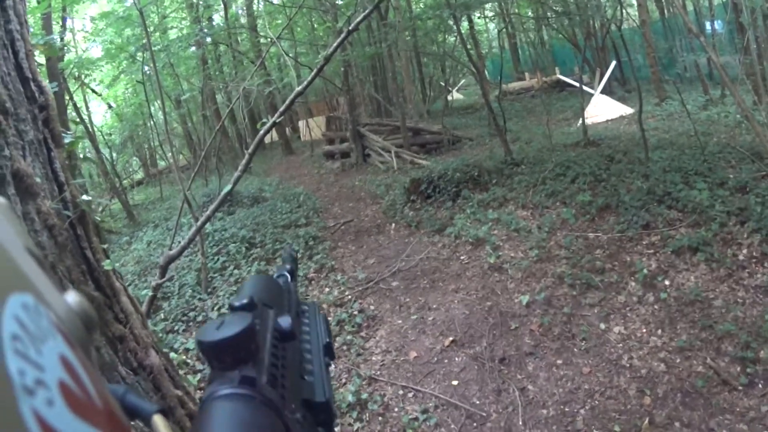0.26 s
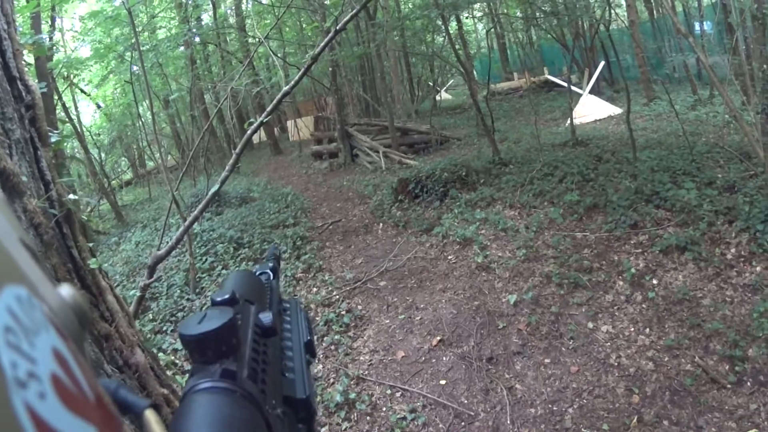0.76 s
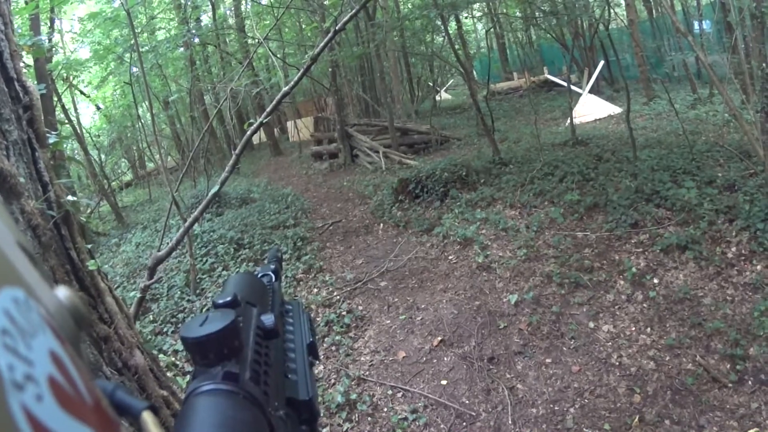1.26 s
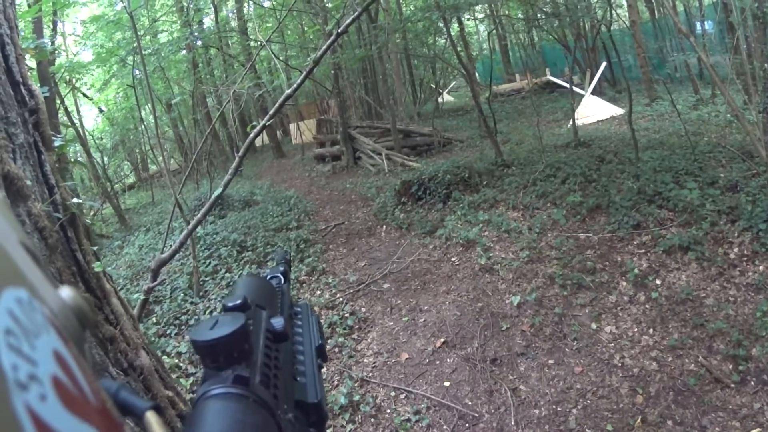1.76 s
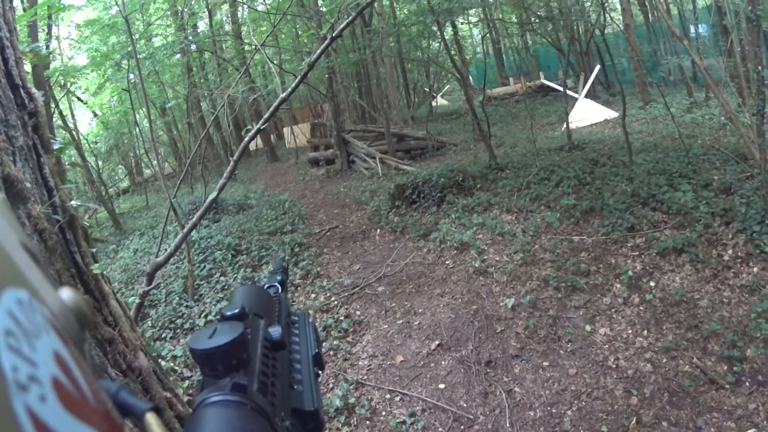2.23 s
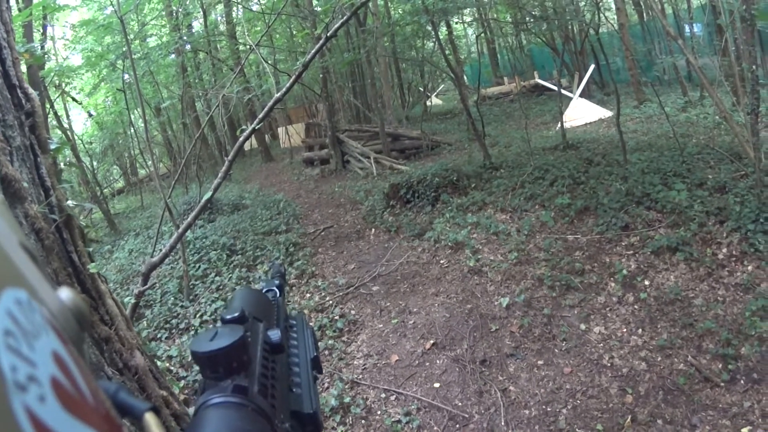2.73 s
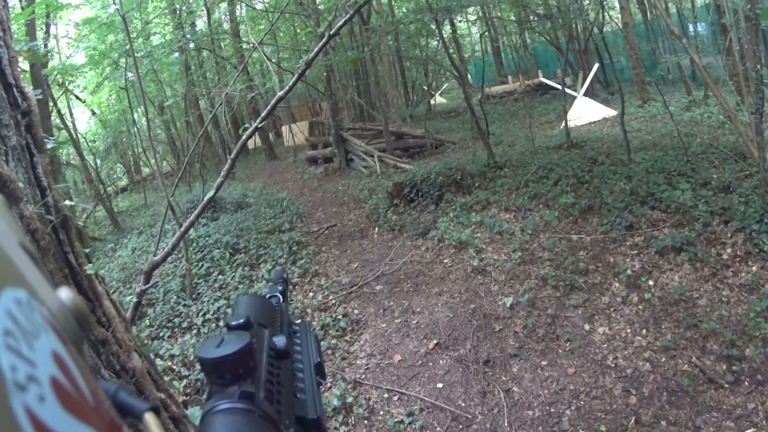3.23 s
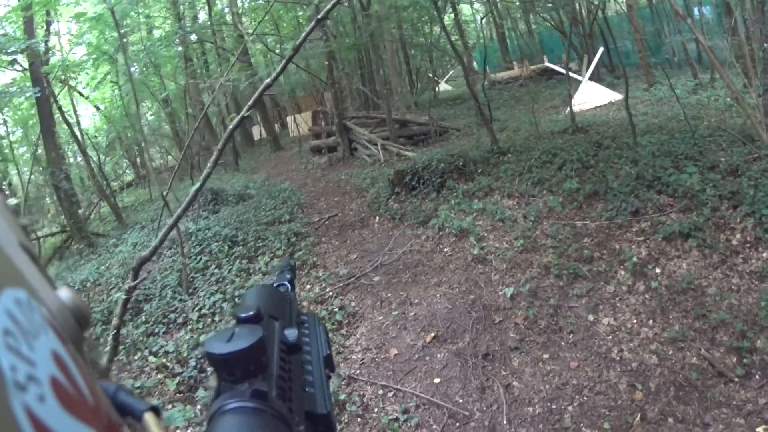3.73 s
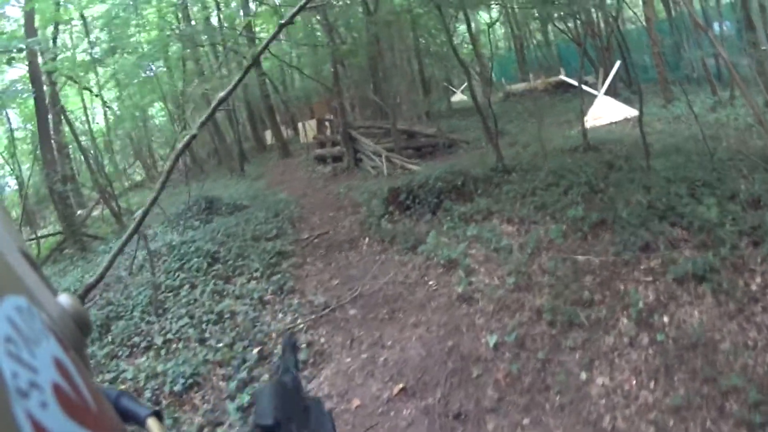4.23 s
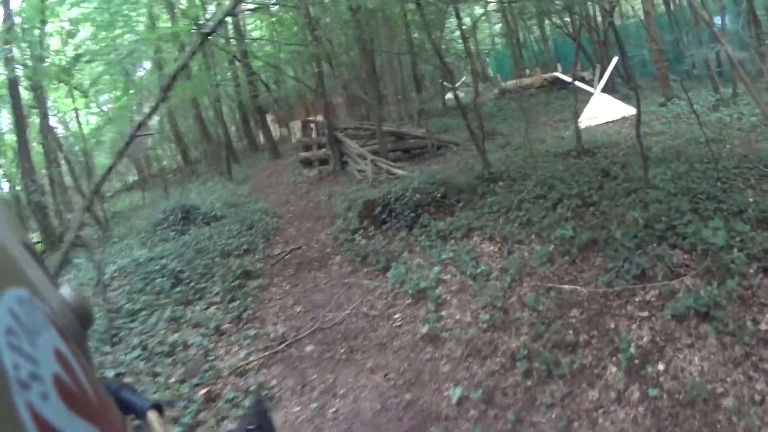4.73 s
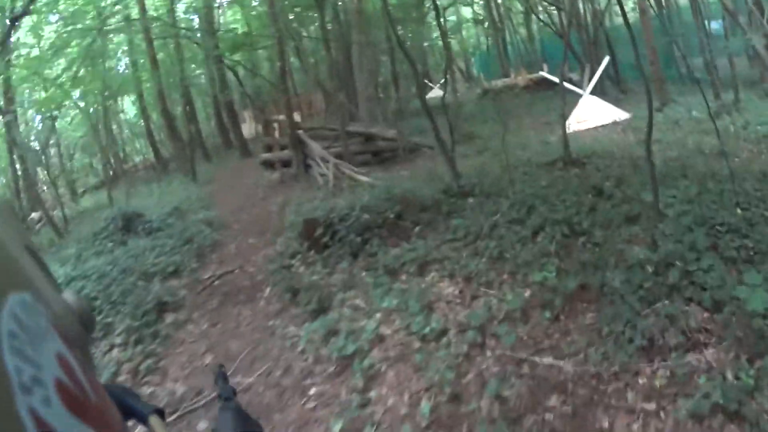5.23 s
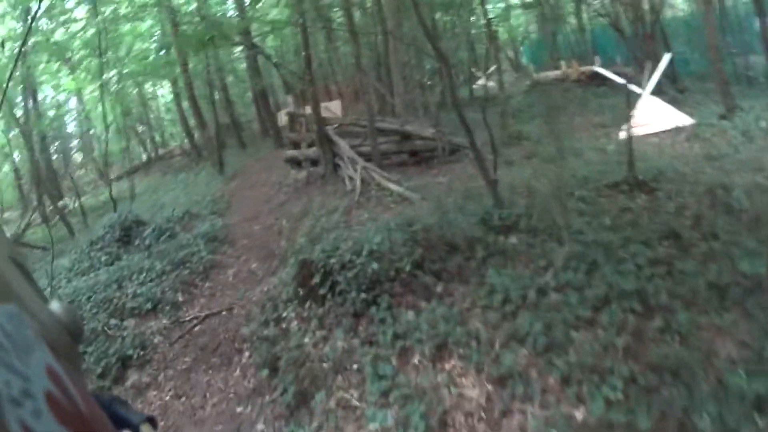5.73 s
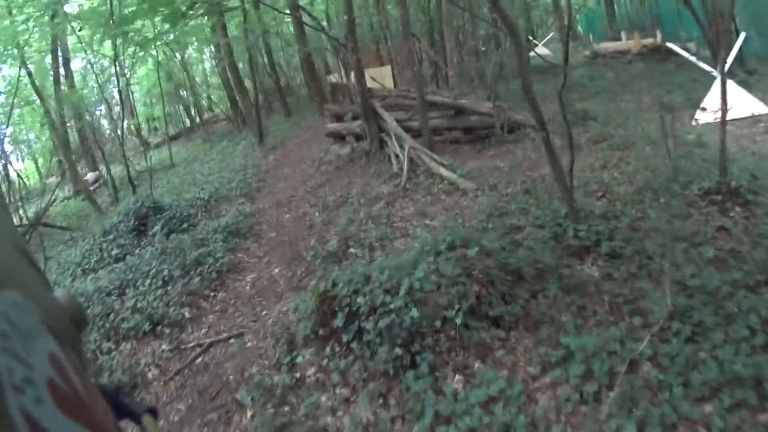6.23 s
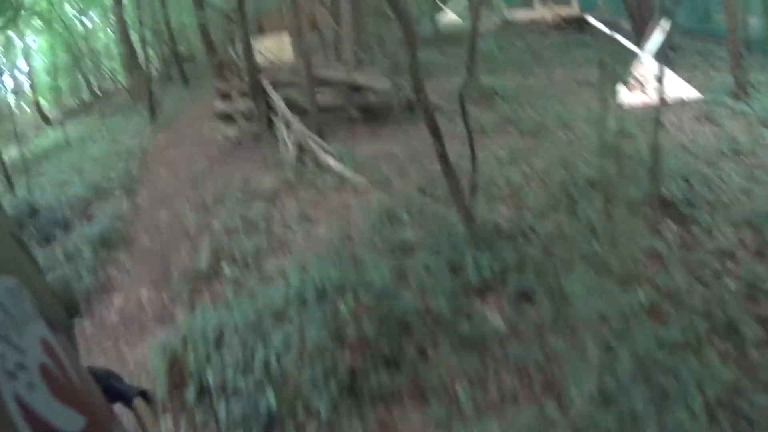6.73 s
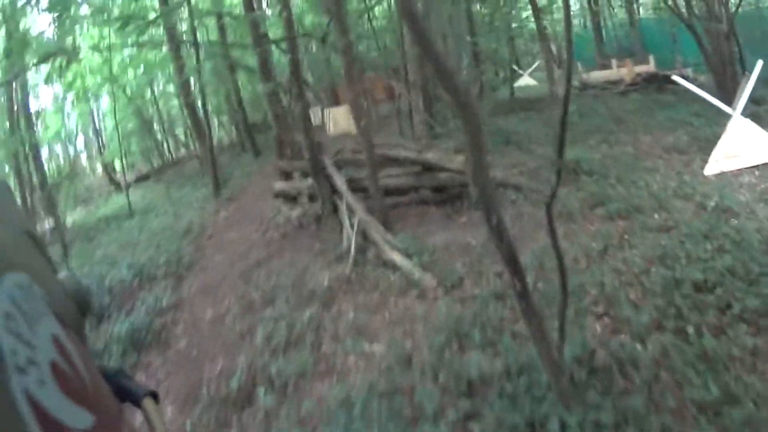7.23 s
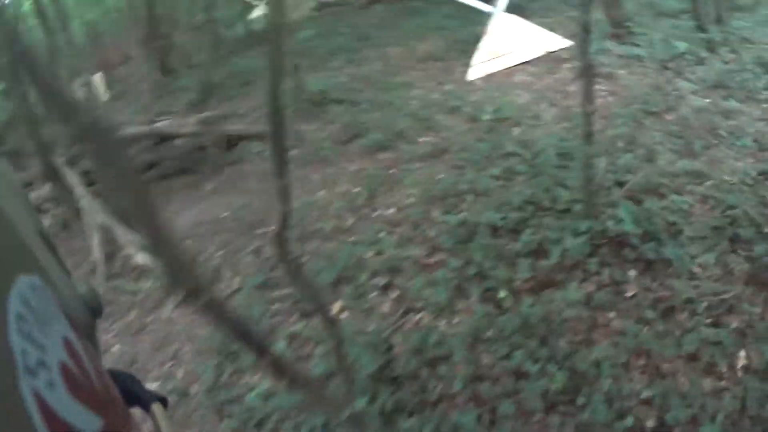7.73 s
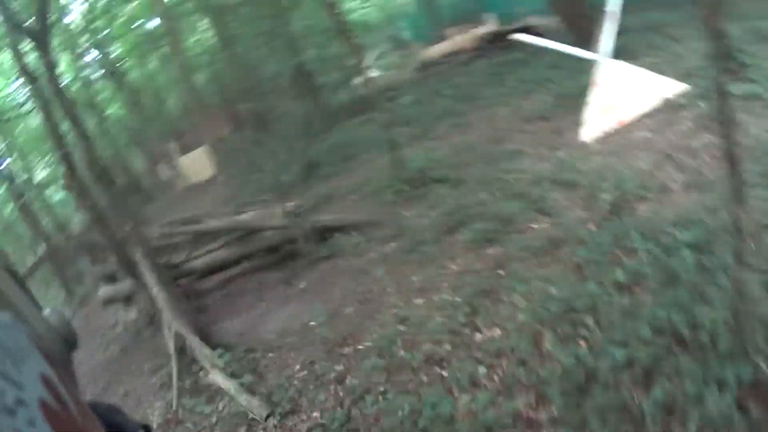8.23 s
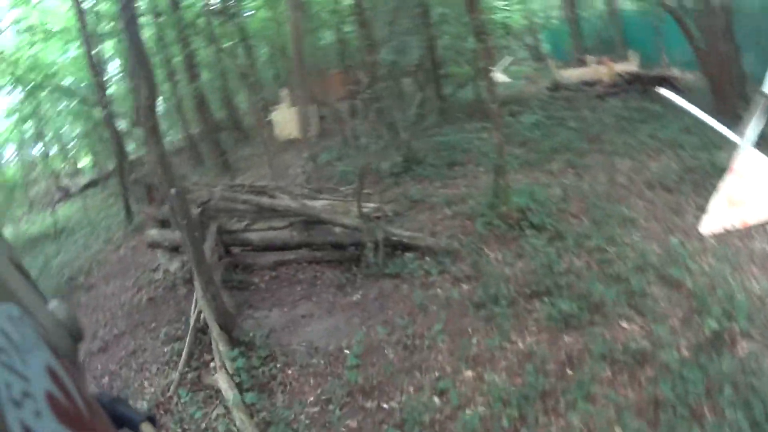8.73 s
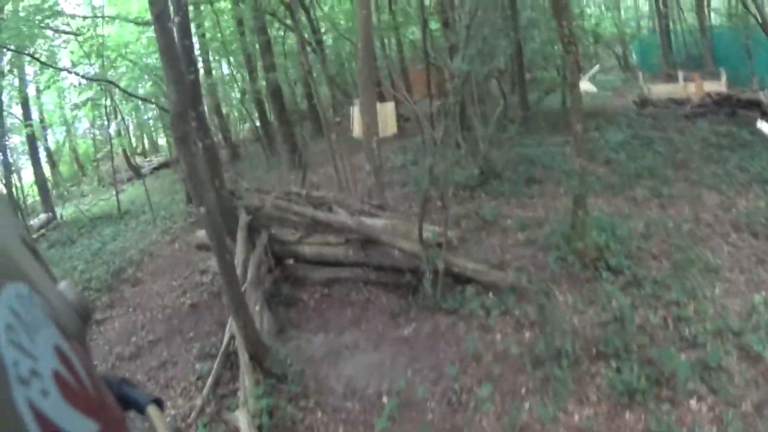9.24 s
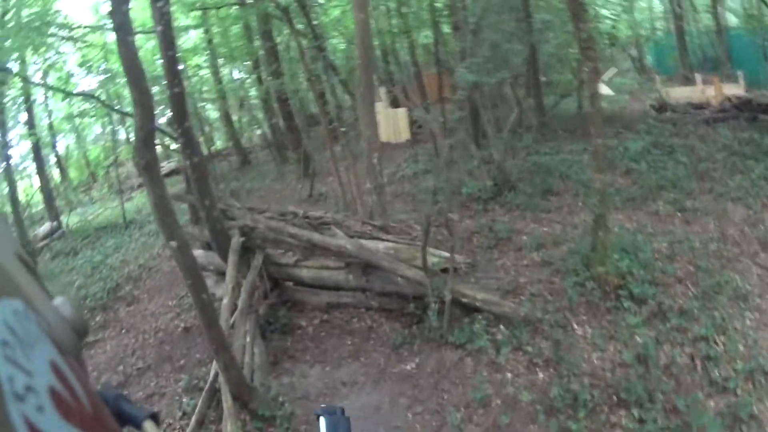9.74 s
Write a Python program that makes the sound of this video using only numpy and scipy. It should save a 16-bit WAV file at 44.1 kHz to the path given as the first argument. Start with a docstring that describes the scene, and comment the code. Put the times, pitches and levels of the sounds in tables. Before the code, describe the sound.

Distant and close bursts of electric toy gunfire in woodland, a quiet pause with faint birds, then rustling leaf footsteps and rattling gear.

```python
"""Another rifle's volley cracks among trees over faint leaf hiss; then the wearer's airsoft rifle fires two bursts.
Later the wearer walks over leaf litter, gear knocks on a camera's plastic case, and small birds call far off.
Impacts are short noise bursts, mostly with a click, driving resonances or filters; leaves, cloth and gears are
shaped noise, birds are gliding sines, and trees return a decaying noise wash."""
import sys
import numpy as np
from scipy import signal
from scipy.fft import rfft, irfft
from scipy.io import wavfile
from scipy.ndimage import uniform_filter1d

SR = 44100
rng = np.random.default_rng(int(sys.argv[2]) if len(sys.argv) > 2 else 0)


def transcribe(signal):
    """Save signal, clipped to [-1, 1], as a 16-bit WAV file at the path in sys.argv[1]."""
    frames = np.atleast_2d(signal).T
    limited = np.clip(frames, -1, 1)
    pcm = np.round(limited * 32767).astype(np.int16)
    wavfile.write(sys.argv[1], SR, pcm)


N = 439677
TIME = np.arange(N) / SR  # s
HIT_TIME = np.arange(SR // 6) / SR  # s, the span of one impact

# Levels in the tables are relative: each source may apply further gains.

# Woodland air: leaf hiss spectrum. Each row: frequency in Hz, response in dB.
WOOD_SPECTRUM = [(15, -39), (25, -6), (86, -4.5), (178, -15), (225, -12), (358, -10), (954, -17),
                 (1030, -15.5), (1600, -14), (1770, -4), (2300, -13), (3050, -6), (4500, -16.5),
                 (10500, -31), (12000, -38), (15600, -93), (22000, -120)]
WOOD_DB = -53.5
# Scattering by the trunks. Each row: frequency in Hz, response in dB.
TREE_SPECTRUM = [(240, -32), (400, -17), (613, -38), (980, -36), (1480, -20.5), (1730, -4.5), (2210, -12.5),
                 (3380, 0.5), (4370, -4), (5260, -2), (5810, -5), (10600, -15.5), (11300, -25),
                 (12000, -60), (15600, -112), (22000, -120)]
# Drawn-out bird whistles. Each row: start in seconds, length in seconds, starting pitch in Hz, level in dB.
WHISTLES = [(3.08, 0.106, 4250, -66), (3.26, 0.156, 6880, -65.5), (3.535, 0.073, 5194, -56.5),
            (4.16, .1, 6180, -60), (4.294, 0.116, 7960, -68), (4.48, 0.152, 7900, -67),
            (4.66, .14, 7900, -67)]
WHISTLE_SAG_HZ_PER_S = 2000
# A trill of short falling notes
TRILL_S, TRILL_GAP_S, TRILL_NOTES = 3.642, .0875, 6
TRILL_NOTE_S, TRILL_FROM_HZ, TRILL_TO_HZ, TRILL_DB = 0.0246, 4970, 4425, -55

# How much the wearer moves. Each row: time in seconds, cloth level in dB, straps rubbing on the case in dB.
MOTION = [(2.3, -76.5, -73), (3.05, -67.5, -66), (4.16, -59, -53.5), (4.5, -63.5, -52), (4.75, -68, -56),
          (4.99, -54, -59), (5.14, -59, -50.5), (5.8, -58.5, -50.5), (6.21, -57.5, -45.5), (7.08, -52, -49),
          (7.51, -52.5, -48.5), (7.68, -60.5, -54), (8.11, -52, -48.5), (8.26, -63, -53.5),
          (9.09, -57.5, -54), (9.24, -50.5, -52), (9.54, -54.5, -49), (9.97, -53, -62)]
STILL_DB = -63  # rubbing level at which the soft gate on motion noise is half open
# Coarse leaf crackle. Each row: frequency in Hz, response in dB.
LEAF_SPECTRUM = [(900, -10.5), (1300, -2.5), (2200, -10.5), (3000, 3.5), (4200, -1), (5600, -9.5),
                 (7500, -29), (11000, -42.5)]
# Crisp leaf crackle. Each row: frequency in Hz, response in dB.
CRISP_SPECTRUM = [(3000, -20.5), (5500, 6), (7000, 0), (9000, 0), (11000, -11.5)]
# Shifting cloth. Each row: frequency in Hz, response in dB.
CLOTH_SPECTRUM = [(25, -1.5), (50, -7.5), (90, 3.5), (200, -8), (300, -5.5), (420, 2), (600, -15.5),
                  (900, -24.5), (1500, -28.5)]
FOLDS_PER_S, FOLD_DB = 22, 2.5  # cloth shifts in fits as its folds give way
# Boots sweeping through leaves. Each row: start in seconds, length in seconds, level in dB.
SWEEPS = [(4.905, 0.301, -48.5), (5.402, 0.18, -46), (5.654, 0.33, -42), (5.98, 0.68, -42),
          (6.583, 0.35, -42.5), (7.102, 0.23, -40), (7.313, 0.1124, -42), (7.76, 0.25, -46),
          (7.943, 0.2833, -41.5), (8.411, 0.55, -44), (9.192, 0.34, -48.5), (9.64, 0.44, -51)]
# Fine crackle of a sweep. Each row: frequency in Hz, response in dB.
SWEEP_SPECTRUM = [(1200, -23), (2000, 5.5), (3200, 6), (4400, -0.5), (5500, 1.5), (7000, -10), (11000, -11)]
# Footfalls and jolts through the body. Each row: start in seconds, level in dB, pack bump in dB relative to it.
STEPS = [(1.2, -60, 7), (3.888, -43, -15), (4.044, -37.5, 2.5), (4.221, -44, -18.5), (4.997, -31.5, -5.5),
         (5.523, -33, -5), (6.119, -45, 2), (6.41, -35, -3.5), (6.793, -33.5, 0.5), (7.341, -34.5, -18),
         (7.589, -39, -4), (8.19, -43, -7.5), (8.788, -38, -1), (9.469, -44, -13)]
TOE_S, TOE_DB = 0.088, -12  # the sole rolls down after the heel
SWAY_HZ, SWAY_DB = 29, -6.5  # each step also shakes the camera slowly

# Gear knocking on the case; the rows at 6.634 and 6.7495 s are the sharp smack of the other rifle's two shots.
# # Each row: start in seconds, level in dB, ring of the loose part in Hz, hardness in dB, weight in dB.
KNOCKS = [(0.08, -33, 3500, -6, -5.5), (0.1816, -30, 3100, -10, -8.5), (0.3142, -28, 4050, 2.5, -2.5),
          (0.3486, -26.5, 2520, 0, -9.5), (3.38, -44, 2600, -12, -16), (4.0524, -23.5, 2560, -5.5, -15),
          (5.001, -24, 2450, -14, -13), (5.243, -23.5, 2400, -32.5, -26), (5.3048, -32.5, 2850, -5.5, -42),
          (5.4782, -35, 2740, -7, -8.5), (5.5224, -19.5, 2450, -1, -12), (5.5705, -32, 2610, -20, -37),
          (6.4123, -30.5, 3120, 3, -9.5), (6.634, -20.5, 2960, -2.5, -44), (6.7495, -22, 3206, 1, -45.5),
          (7.3901, -16.5, 2680, -2.5, -24.5), (7.5793, -23, 2560, -3, -11.5), (7.633, -33, 3540, -32, -8),
          (7.9108, -14, 2300, -29.5, -31), (8.2208, -18.5, 2350, 3, -26), (8.2371, -22, 2820, 3.5, -32),
          (8.759, -28.5, 2550, -10, -13), (9.6353, -38, 3450, -12.5, -12), (9.7126, -26, 3340, 5, -23),
          (9.7275, -25.5, 2540, 1, -6.5)]
KNOCK_T60_S = 0.031
# Upper resonances of the case. Each row: frequency in Hz, width in Hz, gain in dB.
CASE_MODES = [(1650, 41, -52), (1781, 108, 17), (1940, 77, -8), (2590, 68, -6)]
# Lower resonances of the case. Each row: frequency in Hz, width in Hz, gain in dB.
LOW_CASE_MODES = [(512, 24, -1), (777, 26, -5.5), (1197, 77, 7)]
LOW_RING_DB, LOW_RING_PER_WEIGHT = -4.5, 0.29  # dB, dB per dB: heavier knocks reach the lower modes
# Bright tick of a hard contact. Each row: frequency in Hz, response in dB.
TICK_SPECTRUM = [(1500, -22), (3000, 4.5), (4200, -4), (4800, -14), (5400, 1), (6400, -13), (7300, -3),
                 (8800, -17), (11000, -14.5)]
TICK_DB, TICK_PER_HARDNESS = -7.5, 2.75  # dB, dB per dB: harder knocks tick more
# Dull thud of a heavy contact. Each row: frequency in Hz, response in dB.
THUD_SPECTRUM = [(25, -37), (70, 10), (150, -6), (260, -8), (400, 0.5), (560, -8), (750, -5.5),
                 (1200, -36.5)]
# A loose part chattering on the case. Each row: start in seconds, length in seconds, time between bounces
# in seconds, level of each bounce in dB, hardness in dB.
CHATTERS = [(5.011, .015, .005, -9.5, -18.5), (5.033, .009, 0.0054, -10, -21),
            (5.0938, .02, .0075, -8, -14)]
BOUNCE_SCATTER_DB, CHATTER_HZ, CHATTER_WEIGHT_DB = 1.5, 2470, -33.5
# Twigs snapping and buckles clicking. Each row: start in seconds, level in dB.
SNAPS = [(0.437, -36), (2.015, -36.5), (4.6746, -33), (5.1227, -27), (5.159, -25), (5.7828, -32),
         (5.8493, -31), (6.114, -25.5), (6.3262, -32), (7.8324, -33.5), (7.8802, -32.5), (8.278, -28),
         (9.188, -36.5), (9.5773, -24.5), (9.7556, -29)]
SNAP_HZ, SNAP_SCATTER = 2760, 0.18  # centre pitch, its spread in natural-log units
JOSTLES_PER_S, JOSTLE_FROM_DB = 5, -54  # gear jostles once the straps rub this loudly
JOSTLE_DB, JOSTLE_SCATTER_DB = 7.5, 4  # click level relative to the rubbing straps, and its spread

# Trigger pulls of the other rifle. Each row: start in seconds, number of shots, crack in dB, tree echo in dB.
VOLLEYS = [(-.0301, 4, -14, -31), (0.4294, 1, -24, -35.5), (1.952, 1, -27.5, -35), (5.911, 5, -17.5, -29),
           (6.631, 2, -52.5, -35), (9.4532, 1, -22.5, -42.5), (9.5777, 1, -31.5, -55)]
# Crack of a shot. Each row: frequency in Hz, response in dB.
CRACK_SPECTRUM = [(290, -46), (500, -25), (1170, -28), (3010, 7.5), (3820, 10.5), (4610, 2), (5260, 4.5),
                  (9200, 1.5), (10900, -10), (12000, -60), (15600, -108), (22000, -120)]
CYCLE_S, SPIN_UP_S = .1146, .0055  # time between shots; the first cycle is slower by the second value

# Gearbox cycles of the own rifle. Each row: gears take up the spring in seconds, piston is let go in seconds,
# whirr at the start in dB, whirr at the end in dB.
WINDINGS = [(0.645, 0.693, -35.5, -19.5), (0.732, 0.803, -15, -16), (0.828, 0.884, -12.5, -19),
            (1.374, 1.433, -16, -15), (1.467, 1.518, -16.5, -15), (1.548, 1.606, -14.5, -18),
            (1.623, 1.659, -34, -16.5), (1.669, 1.707, -29, -26.5)]
# Trigger pulls. Each row: motor at speed in seconds, motor stops in seconds, spring hum in dB.
BURSTS = [(0.677, 0.865, -38), (1.328, 1.677, -48.5)]
SPRING_HZ = 154
# Piston slams. Each row: start in seconds, level in dB.
SLAMS = [(0.7003, -11.5), (0.801, -14.5), (1.3339, -13.5), (1.4385, -15), (1.5205, -16.5), (1.6029, -15.5)]
SLAM_THUMP_DB, REBOUND_S, REBOUND_DB = -16, .0085, 0.5  # levels relative to the slam
# The latch catching the gears. Each row: start in seconds, level in dB.
LATCHES = [(0.9087, -12.5), (1.3207, -30.5), (1.725, -14.5), (1.747, -28.5)]
# Gearbox noise. Each row: frequency in Hz, response in dB.
GEARBOX_SPECTRUM = [(60, -20.5), (200, -18.5), (560, -32), (830, -13), (950, -70), (1150, -9.5),
                    (1550, -33), (1800, 9), (2200, -6), (2900, 5), (4500, -6.5), (5400, 0), (6800, -9.5),
                    (11300, -14.5)]
# Rifle resonances as the case passes them on. Each row: frequency in Hz, width in Hz, gain in dB.
RIFLE_MODES = [(440, 50, 5), (1180, 130, -36), (1790.2, 22.8, 8), (1826, 27, 14.5), (2750, 115, -1),
               (2991, 250, 9.5), (3230, 142, -9), (3950, 200, 2), (4960, 3200, -2)]
RIFLE_BUMP_S, RIFLE_BUMP_DB = 8.222, -46.5

# Stereo width: the ring of the case reaches both microphones alike. Each row: frequency in Hz, side gain in dB.
WIDTH_SPECTRUM = [(200, 1.5), (600, 6.5), (1200, 8), (1550, -1), (1800, -8.5), (2300, -0.5), (5000, -.5),
                  (9000, 4.5)]
TOP_HZ = 11080


def undb(db):
    """Amplitude ratio: twenty decibels are a factor of ten."""
    return np.exp(np.asarray(db) * np.log(10) / 20)


def level(x, db=0):
    """Root-mean-square normalisation to a given level."""
    return x * undb(db) / np.sqrt(np.mean(x ** 2))


def peak(x, db):
    """Short-time power: a stereo hit is scaled by its loudest two milliseconds."""
    power = uniform_filter1d(np.mean(x ** 2, axis=0), size=88, mode="constant")
    return x * undb(db) / np.sqrt(power.max())


def add(out, s, x):
    """Superposition: mix a stereo sound in at s seconds, cropping what lies outside."""
    i = int(round(s * SR))
    a, b = max(i, 0), min(i + x.shape[1], N)
    if b > a:
        out[:, a:b] += x[:, a - i:b - i]


def noise(n, side_db, spread_db=0):
    """Mid-side noise, more alike in both ears in the bass; a spread of sizes turns it into separate grains."""
    mid, side = rng.standard_normal((2, n))
    side = signal.sosfilt(signal.butter(1, 400, "high", fs=SR, output="sos"), side)
    grain = np.minimum(rng.exponential(size=n // 16 + 1), 4)
    size = undb(spread_db * np.repeat(grain, 16)[:n])
    return level(size * (mid + undb(side_db) * np.array([side, -side])))


def colour(x, spectrum):
    """Minimum-phase filtering: folding the cepstrum makes a magnitude response causal."""
    hz, db = np.transpose(spectrum)
    size = 4096
    bins_hz = np.arange(size // 2 + 1) * SR / size
    response_db = np.interp(np.log(bins_hz + 1), np.log(hz), db)
    cepstrum = irfft(np.log(undb(response_db)))
    cepstrum[1:size // 2] *= 2
    cepstrum[size // 2 + 1:] = 0
    impulse = irfft(np.exp(rfft(cepstrum)))
    return signal.oaconvolve(x, impulse[None], axes=1)[:, :x.shape[1]]


def band(x, hz, width):
    """A single resonance with unit gain at its centre; its Q is frequency over width."""
    return signal.lfilter(*signal.iirpeak(hz, hz / width, fs=SR), x)


def ring(x, modes):
    """Modal superposition: a body responds as the sum of its resonances."""
    return sum(undb(db) * band(x, hz, width) for hz, width, db in modes)


def fade(t, t60):
    """Exponential decay by 60 dB in t60 seconds."""
    return np.exp(-np.log(1000) * t / t60)


def contact(t60, side_db, click=0):
    """Impact excitation: an optional impulse at first touch and a decaying chatter."""
    push = noise(len(HIT_TIME), side_db) * fade(HIT_TIME, t60)
    push[:, 0] += click
    return push


def trees(t60):
    """Multiple scattering: trunks spread a sound into a fading wash, cut off after at most one second."""
    n = int(SR * min(t60, 1))
    return level(colour(noise(n, side_db=-5), TREE_SPECTRUM)) * fade(TIME[:n], t60)


def echo(x, t60, wet_db):
    """Reverberation by convolution: a sound together with its return from the trees."""
    wash = trees(t60)
    impulse = wash / np.sqrt(np.sum(wash ** 2) / 2)
    return x + undb(wet_db) * signal.fftconvolve(x, impulse, axes=1)[:, :N]


def woodland_air():
    """Broadband leaf hiss, with a faint narrow band where it rings the case."""
    hiss = level(colour(noise(N, side_db=-1), WOOD_SPECTRUM), WOOD_DB)
    case_ring = level(band(noise(N, side_db=-1), 1796, 71), -59)
    return hiss + case_ring


def bird_note(length, start_hz, end_hz, db):
    """Frequency modulation: integrating a gliding pitch gives the phase of a thin tone."""
    n = int(length * SR)
    phase = 2 * np.pi * np.cumsum(np.linspace(start_hz, end_hz, n)) / SR
    note = np.sin(phase) * signal.windows.tukey(n, .6)
    return undb(db) * np.array([note, note])


def birds():
    """Falling tones in sequence, drawn out by reverberation among the trees."""
    song = np.zeros((2, N))
    for s, length, hz, db in WHISTLES:
        add(song, s, bird_note(length, hz, hz - WHISTLE_SAG_HZ_PER_S * length, db))
    for k in range(TRILL_NOTES):
        note = bird_note(TRILL_NOTE_S, TRILL_FROM_HZ, TRILL_TO_HZ, TRILL_DB)
        add(song, TRILL_S + k * TRILL_GAP_S, note)
    return echo(song, t60=1.1, wet_db=-4)


def folds():
    """Random amplitude modulation: smoothed random steps make a gain that swells and drops."""
    hold = SR // FOLDS_PER_S
    steps = np.repeat(rng.standard_normal(N // hold + 1), hold)[:N]
    return undb(FOLD_DB * uniform_filter1d(steps, size=hold))


def motion_noise():
    """Friction noise: cloth, rubbing straps and leaf crackle follow the wearer's motion."""
    times, cloth_db, rub_db = np.transpose(MOTION)
    cloth = undb(np.interp(TIME, times, cloth_db))
    rub = undb(np.interp(TIME, times, rub_db))
    moving = rub ** 2 / (rub ** 2 + undb(STILL_DB) ** 2)
    leaves = level(colour(noise(N, side_db=-6, spread_db=4.5), LEAF_SPECTRUM), -0.86)
    crisp = level(colour(noise(N, side_db=-5, spread_db=4.5), CRISP_SPECTRUM), -11.5)
    shifting = level(colour(noise(N, side_db=-11.5, spread_db=2.5), CLOTH_SPECTRUM), 3.8)
    grains = noise(N, side_db=-32.5, spread_db=5.5)
    straps = level(band(band(grains, 1762.7, 80), 2016, 382), 1.6)
    return moving * (rub * (leaves + crisp + straps) + cloth * folds() * shifting)


def sweeps():
    """Granular friction: a boot in dry leaves makes a swell of tiny, coarse and crisp crackles."""
    swell = np.zeros((2, N))
    for s, length, db in SWEEPS:
        add(swell, s, undb(db) * signal.windows.tukey(int(length * SR), .6)[None])
    fine = noise(N, side_db=-6.5, spread_db=3.0)
    coarse = noise(N, side_db=-5, spread_db=4.5)
    crackle = level(colour(fine, SWEEP_SPECTRUM), -3.6)
    crackle += level(colour(coarse, LEAF_SPECTRUM), -5.5)
    crackle += level(colour(coarse, CRISP_SPECTRUM), -8)
    return swell * crackle


def footfalls():
    """Low resonances under impact: heel then toe, a slow shake of the camera and a bump of the pack."""
    out = np.zeros((2, N))
    for s, db, bump_db in STEPS:
        for lag, size_db in [(0, 0), (TOE_S, TOE_DB)]:
            thud = band(band(contact(t60=0.18, side_db=-47), 82, 55), 72, 126)
            add(out, s + lag, peak(thud, db + size_db))
        sway = band(band(contact(t60=0.098, side_db=-46), SWAY_HZ, 25), SWAY_HZ, 25)
        add(out, s, peak(sway, db + SWAY_DB))
        pack = band(band(contact(t60=0.2, side_db=-16.5), 293, 140), 420, 270)
        add(out, s, peak(pack, db + bump_db))
    return out


def knock(db, hz, hard_db, weight_db):
    """Coupled bodies: a knock rings case and loose part; hardness adds a tick, weight adds a thud."""
    push = contact(KNOCK_T60_S, side_db=-18, click=7)
    rattle = contact(KNOCK_T60_S, side_db=-10, click=7)
    case = ring(band(band(push, 2284, 667), 1310, 1180), CASE_MODES)
    low_case = ring(band(band(push, 1018, 1190), 1046, 1600), LOW_CASE_MODES)
    part = band(band(rattle, hz, 510), hz, 796)
    thud = band(colour(contact(t60=0.067, side_db=-13, click=3.06), THUD_SPECTRUM), 380, 900)
    tick = colour(contact(t60=0.029, side_db=3, click=1), TICK_SPECTRUM)
    return (peak(case, db - 3)
            + peak(low_case, db + LOW_RING_DB + LOW_RING_PER_WEIGHT * weight_db)
            + peak(part, db + hard_db)
            + peak(thud, db + weight_db)
            + peak(tick, db + TICK_DB + TICK_PER_HARDNESS * hard_db))


def snap(db):
    """A light, brief impact: a bright click of slightly random pitch that faintly rings the case."""
    hz = SNAP_HZ * np.exp(SNAP_SCATTER * rng.standard_normal())
    push = contact(t60=0.0157, side_db=-5.5, click=1)
    click = band(colour(push, TICK_SPECTRUM), hz, 1370) + band(push, hz, 324)
    return peak(click + 0.27 * ring(push, CASE_MODES), db)


def jostles():
    """Motion-driven impacts: small clicks at jittered times, louder as the straps rub harder."""
    out = np.zeros((2, N))
    times, _, rub_db = np.transpose(MOTION)
    gap = 1 / JOSTLES_PER_S
    for slot in np.arange(times[0], times[-1] - gap, gap):
        s = slot + gap * rng.random()
        motion_db = np.interp(s, times, rub_db)
        if motion_db > JOSTLE_FROM_DB:
            add(out, s, snap(motion_db + JOSTLE_DB + JOSTLE_SCATTER_DB * rng.standard_normal()))
    return out


def gear():
    """Impacts on a resonant shell: single knocks, snaps, jostles and runs of quick bounces."""
    out = jostles()
    for s, db, hz, hard_db, weight_db in KNOCKS:
        add(out, s, knock(db, hz, hard_db, weight_db))
    for s, db in SNAPS:
        add(out, s, snap(db))
    for start, length, gap, db, hard_db in CHATTERS:
        for s in np.arange(start, start + length, gap):
            bounce_db = db + BOUNCE_SCATTER_DB * rng.standard_normal()
            add(out, s, knock(bounce_db, CHATTER_HZ, hard_db, CHATTER_WEIGHT_DB))
    return out


def other_rifle():
    """Direct sound and scattering: each shot is a dry snap, a short scatter and a longer hiss from the wood."""
    out = np.zeros((2, N))
    for start, count, db, echo_db in VOLLEYS:
        for k in range(count):
            s = start + k * CYCLE_S + SPIN_UP_S * (k > 0)
            crack = colour(contact(t60=0.018, side_db=-2, click=10.5), CRACK_SPECTRUM)
            add(out, s, peak(crack, db))
            add(out, s + 0.0039, trees(t60=0.2) * undb(echo_db - 0.5))
            add(out, s + 0.0015, trees(t60=0.65) * undb(echo_db - 1.5))
    return out * undb(np.array([[1.1], [-1.1]]))  # slightly to the left


def gear_whirr(t):
    """Gear-mesh noise under load: teeth grind while winding the spring, then the noise decays."""
    n = len(t)
    load = np.zeros(n)
    for start, release, start_db, end_db in WINDINGS:
        winding = undb(np.interp(t, [start, release], [start_db, end_db])) * (t >= start)
        load = np.maximum(load, winding * fade(np.maximum(t - release, 0), t60=.065))
    # every turn of the motor pinion makes the grinding throb, 300 times a second
    throb = 1 + .4 * np.sin(2 * np.pi * 300 * t)
    teeth = throb * noise(n, side_db=-8, spread_db=2.2)
    whirr = level(colour(teeth, GEARBOX_SPECTRUM), -1.7)
    shell = ring(band(throb * noise(n, side_db=-16), 2530, 4800), RIFLE_MODES)
    return load * (whirr + level(shell, -4))


def motor_and_spring(t):
    """Steady excitation: the motor spins on between windings of a burst and the main spring hums."""
    n = len(t)
    out = np.zeros((2, n))
    motor = level(band(band(noise(n, side_db=-46), 1770, 170), 1950, 357), -29.5)
    motor += level(colour(noise(n, side_db=-15), GEARBOX_SPECTRUM), -23.5)
    hum = level(band(band(noise(n, side_db=-18), SPRING_HZ, 22), SPRING_HZ, 40))
    for start, stop, hum_db in BURSTS:
        out += motor * np.interp(t, [start, start + .01, stop, stop + .02], [0, 1, 1, 0])
        out += hum * undb(hum_db) * np.interp(t, [start, start + .03, stop, stop + .1], [0, 1, 1, 0])
    return out


def gearbox_blow(db):
    """Modal excitation by impact: metal strikes inside the gearbox and rings the rifle."""
    push = contact(t60=.022, side_db=-8.5, click=2.5)
    return peak(colour(push, GEARBOX_SPECTRUM) + 0.24 * ring(push, RIFLE_MODES), db)


def rifle_blows():
    """Impact and rebound: the piston slams, the latch catches, and the shell chatters on after each."""
    out = np.zeros((2, N))
    for s, db in SLAMS:
        add(out, s, gearbox_blow(db))
        add(out, s + REBOUND_S, gearbox_blow(db + REBOUND_DB))
        thump = band(colour(contact(t60=0.025, side_db=-15, click=6.3), THUD_SPECTRUM), 574, 1040)
        add(out, s, peak(thump, db + SLAM_THUMP_DB))
    for s, db in LATCHES:
        add(out, s, gearbox_blow(db))
    for s, db in SLAMS + LATCHES:
        shell = ring(band(contact(t60=0.07, side_db=-22), 2140, 1300), RIFLE_MODES)
        add(out, s + 0.0023, peak(shell, db - 9.5))
    # a bump on the rifle sets the spring ringing once more
    bump = band(contact(t60=.005, side_db=-18, click=20), SPRING_HZ, 5)
    add(out, RIFLE_BUMP_S, peak(bump, RIFLE_BUMP_DB))
    return out


def own_rifle():
    """Superposed gear noise, motor, spring and impacts, with their reverberation from the trees."""
    t = TIME[TIME < WINDINGS[-1][1] + .5]
    out = rifle_blows()
    add(out, 0, gear_whirr(t) + motor_and_spring(t))
    return echo(out, t60=0.74, wet_db=-28) * undb(np.array([[.4], [-.4]]))  # slightly to the left


def scene():
    """Linear superposition of the wood, the wearer, the gear and both rifles."""
    background = woodland_air() + birds()
    walking = motion_noise() + sweeps() + footfalls()
    return background + walking + gear() + other_rifle() + own_rifle()


def record(dry):
    """Mid-side filtering by the case, then saturation rounds the loudest peaks and a low-pass cuts the top."""
    side = colour((dry[:1] - dry[1:]) / 2, WIDTH_SPECTRUM)
    heard = dry.mean(axis=0) + np.vstack([side, -side])
    rounded = np.tanh(0.88 * heard) / 0.89
    return signal.sosfilt(signal.ellip(10, .2, 70, TOP_HZ, fs=SR, output="sos"), rounded)


dry = scene()
out = record(dry)
transcribe(out)
```